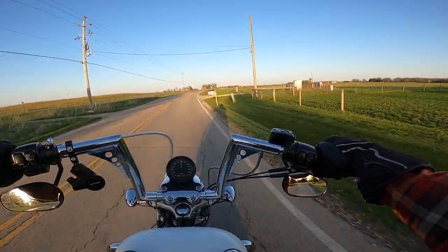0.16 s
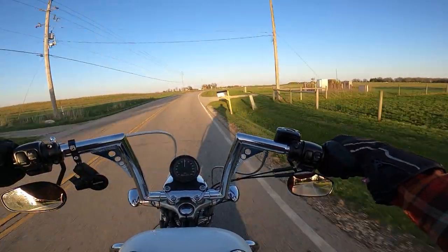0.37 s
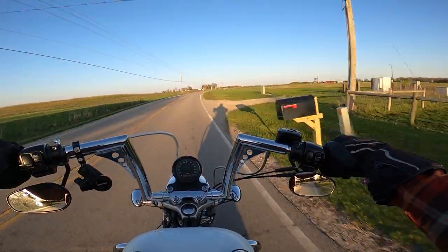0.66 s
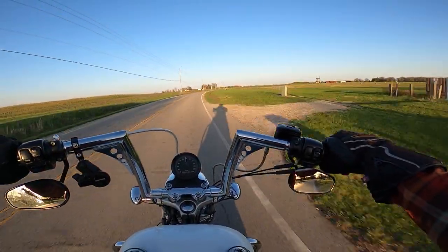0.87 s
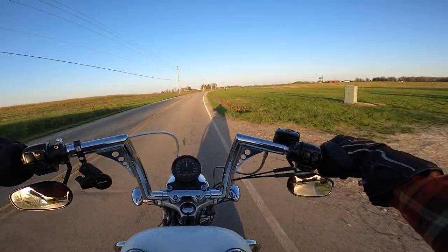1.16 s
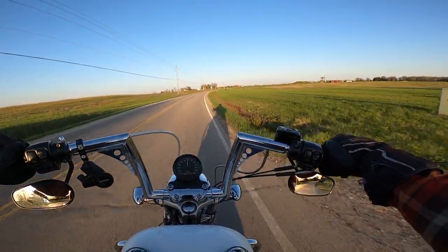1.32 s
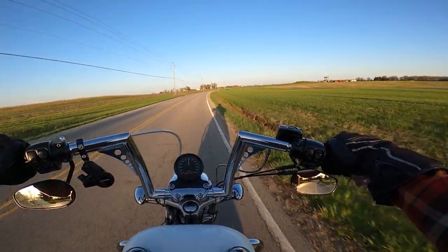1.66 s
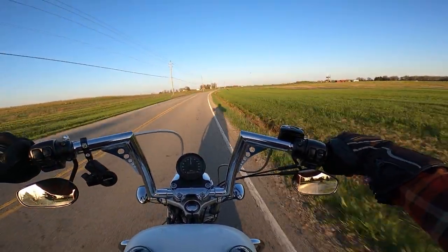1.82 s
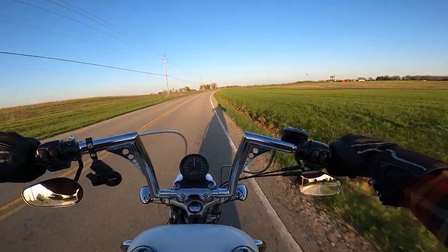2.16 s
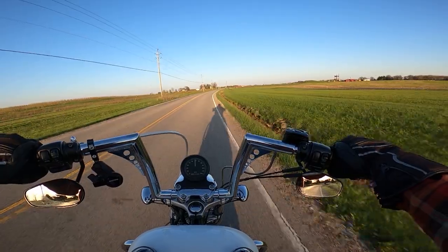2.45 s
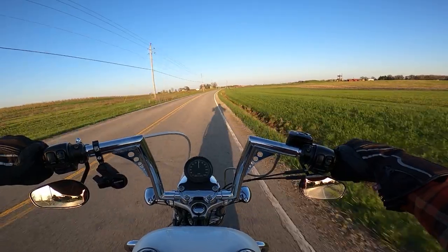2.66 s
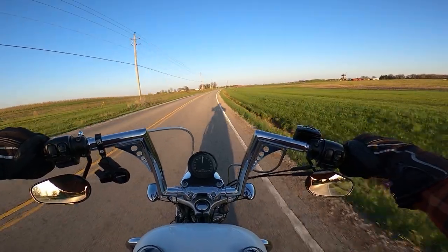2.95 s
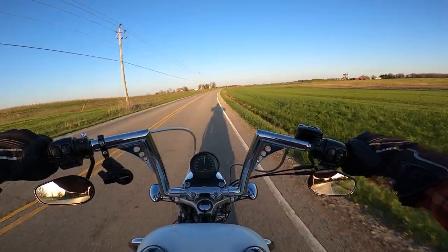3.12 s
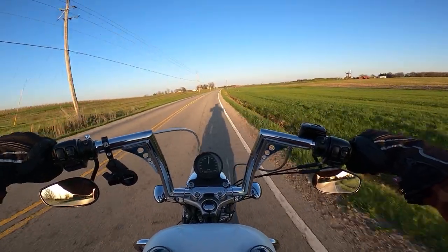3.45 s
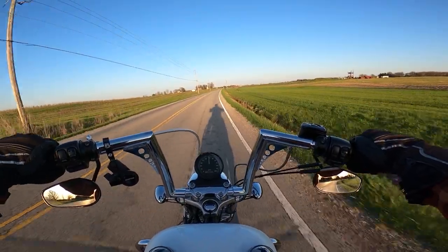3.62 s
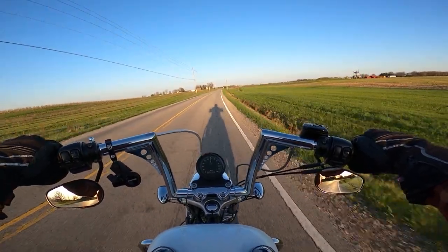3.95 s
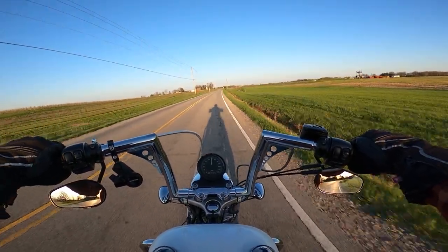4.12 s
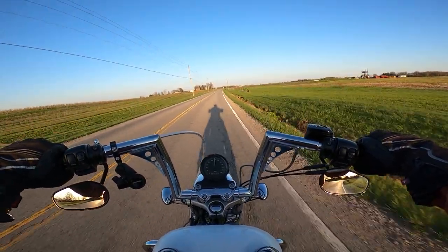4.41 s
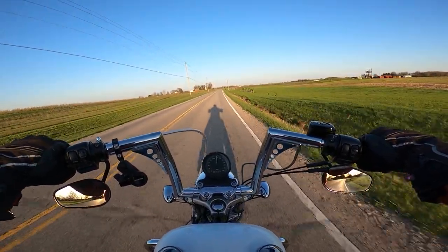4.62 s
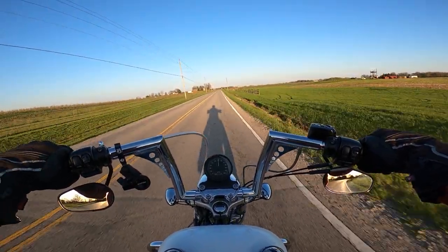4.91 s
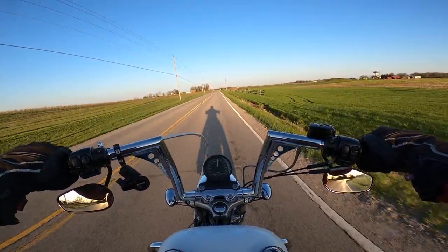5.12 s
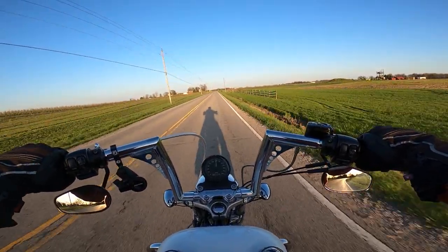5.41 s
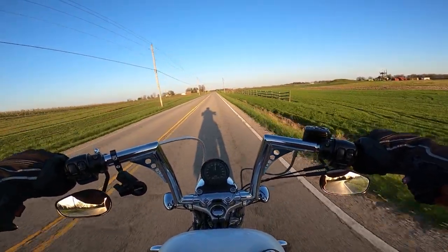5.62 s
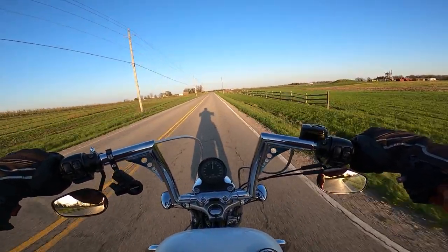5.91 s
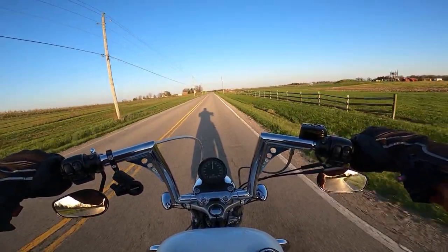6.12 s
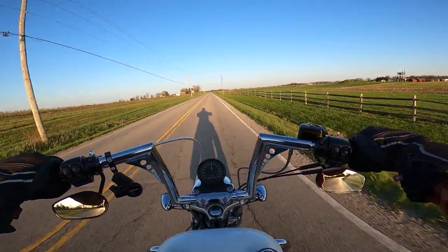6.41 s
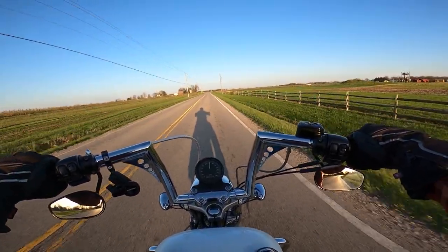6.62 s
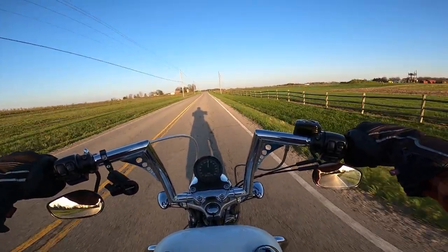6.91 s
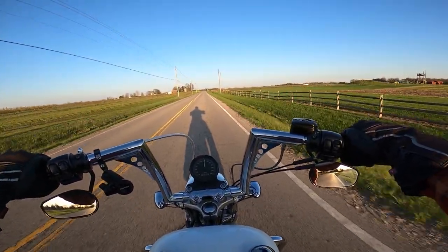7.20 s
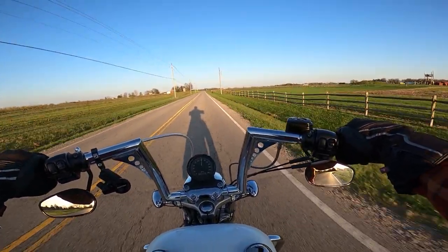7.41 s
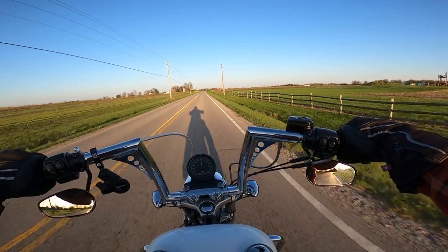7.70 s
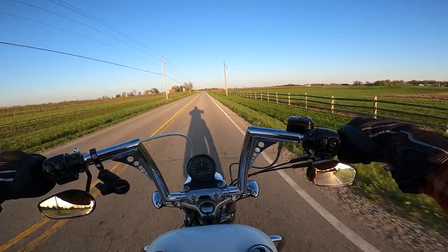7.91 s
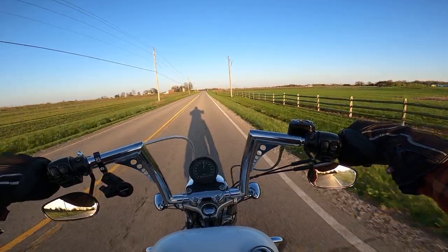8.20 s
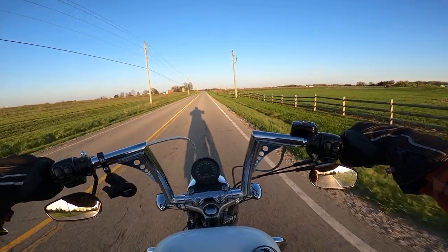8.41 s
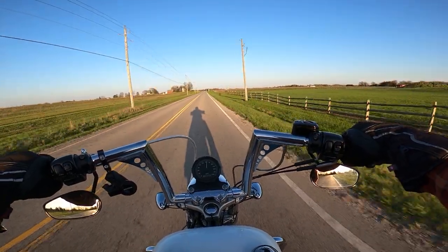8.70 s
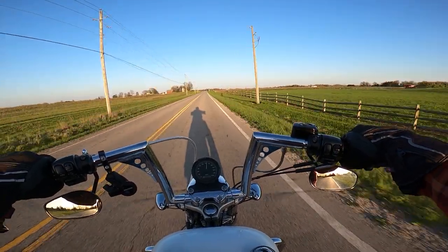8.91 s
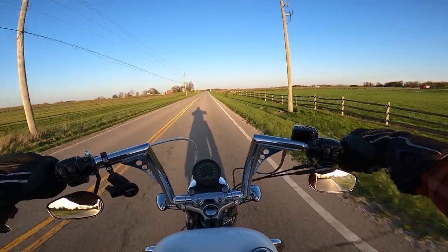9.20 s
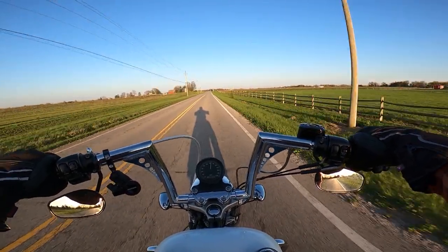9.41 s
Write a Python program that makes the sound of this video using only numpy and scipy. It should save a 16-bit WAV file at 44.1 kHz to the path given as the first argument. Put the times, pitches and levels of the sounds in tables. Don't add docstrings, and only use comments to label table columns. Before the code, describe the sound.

A narrow V-twin motorcycle cruises a country road, deep uneven exhaust throb with ticking valve gear, faint whine and low wind buffeting, heard from the rider's chest.

```python
import sys
import numpy as np
from scipy import signal
from scipy.fft import rfft, irfft
from scipy.io import wavfile
from scipy.ndimage import uniform_filter1d

SR = 44100
rng = np.random.default_rng(int(sys.argv[2]) if len(sys.argv) > 2 else 0)


def generate_wav(signal):
    frames = np.transpose(np.atleast_2d(signal))
    scaled = np.clip(frames, -1, 1) * 32767
    pcm = np.round(scaled).astype(np.int16)
    wavfile.write(sys.argv[1], SR, pcm)


def rack_gain(trim_db):
    fader = np.asarray(trim_db, float)
    return 10 ** (fader / 20)


N = 421155
TIME = np.arange(N) / SR
FIRING = (.693, .128)


def evened(x):
    return x / np.sqrt(np.mean(x ** 2) + 1e-20)


def coloured(spectrum):
    f, db = np.transpose(spectrum)
    hz = np.fft.rfftfreq(N, 1 / SR)
    shape = rack_gain(np.interp(np.log(hz + 1), np.log(f), db, left=-70, right=-120))
    return evened(irfft(rfft(rng.standard_normal(N)) * shape, N))


def drift(hz):
    return evened(signal.sosfilt(signal.butter(2, hz, fs=SR, output="sos"), rng.standard_normal(N)))


def resonate(x, hz, width):
    turn = np.exp(2j * np.pi * np.cumsum(hz * np.ones(N)) / SR)
    decay = np.exp(-np.pi * width / SR)
    return 2 * (turn * signal.lfilter([1 - decay], [1, -decay], x / turn)).real


def above(rpm, knee_rpm, db_per_rpm, waver_db=0):
    return db_per_rpm * np.maximum(rpm - knee_rpm, 0) + waver_db * drift(2.3)


def crank_speed():
    # (t/s, speed/rpm)
    speed = [(0.0, 2887.6), (0.7, 2878.1), (1.5, 2880.8), (2.3, 2888.4), (3.0, 2907.6), (3.8, 2925.3),
             (4.6, 2950.2), (5.3, 2968.2), (6.0, 2996.0), (6.8, 3019.9), (7.6, 3043.7), (8.3, 3068.2),
             (8.8, 3076.9), (9.25, 3076.5), (9.55, 3053.5)]
    return np.interp(TIME, *np.transpose(speed))


def exhaust(cycle, bark_db, upper_db):
    # (f/Hz, width/Hz, signed strength from front cylinder, from rear cylinder)
    pipes = [(115.8, 79.4, -0.0672, -0.0337), (130.47, 28.07, 0.21, 0.22), (193.4, 61.5, 0.0088, -0.0254),
             (231.3, 12, 0.026, -0.037), (284.5, 36.4, -0.035, -0.0209), (371.9, 104.3, 0.01536, 0.0226),
             (388.6, 68.7, -.014, -0.0239)]
    # (f/Hz, width/Hz, level/dB)
    upper_lifts = [(349.7, 23, 6.5), (422.3, 15, 12.5)]
    uneven_db, late_cycles = 0.92, 0.0024
    heat = np.gradient(cycle) * SR * 120 / 2965
    out = np.zeros(N)
    for side, place in enumerate(FIRING):
        blow_number = np.floor(cycle - place + 1.5).astype(int)
        chance = rng.standard_normal((300, 2))[blow_number]
        turn = cycle - place - late_cycles * chance[:, 1]
        pulses = sum(np.cos(2 * np.pi * k * turn) for k in range(1, 19))
        blows = rack_gain(uneven_db * chance[:, 0]) * pulses
        for hz, width, *strength in pipes:
            out += strength[side] * resonate(blows, hz * heat, width)
    out += sum((rack_gain(db) - 1) * resonate(out, hz * heat, width) for hz, width, db in upper_lifts)
    out += (rack_gain(1.3 * (bark_db - bark_db.mean())) - 1) * resonate(out, 315 * heat, 40)
    return out + (rack_gain(1.9 * (upper_db + 0.92)) - 1) * resonate(out, 390 * heat, 110)


def valve_gear(cycle, case_db, fin_db):
    # (level/dB into the tank, level/dB into the cases, level/dB into the fins)
    knocks = [(-8.5, -8, -4.5), (-3.5, -11.5, -10), (-27.5, -4.5, -8), (-25.5, -1, -11.5),
              (-33.5, -6.5, -2), (-27, -6, -10), (-31, -14, -8), (-30.5, -11.5, -1.5), (1, -14, -13.5),
              (-30.5, -10.5, -11), (-28.5, -4, -20.5), (-34, -8, -6.5), (-29.5, -10.5, -10.5),
              (0.5, -9.5, -9.5), (-27.5, -4.5, -1.5), (-33, -6, -6.5)]
    knock_places = (.03, .105, .175, .24, .285, .37, .44, .49, .53, .57, .605, .67, .70, .75, .84, .925)
    # (f/Hz, width/Hz)
    tank_mode = (514, 270)
    # (f/Hz, width/Hz, level/dB)
    case_modes = [(710, 56, 0), (898.5, 65, 3), (1087, 45, -1.5), (1294, 110, -0.5)]
    # (f/Hz, width/Hz, level/dB)
    fin_modes = [(2293, 430, 4), (2560, 190, 2.5), (3090, 470, -5), (3796, 150, -0.5)]
    spread_db, slow_db = 3.0, 1.3
    late_cycles, burst_s = 0.0018, 0.0012

    chance = np.clip(rng.standard_normal((int(cycle[-1]) + 1, len(knocks), 5)), -2, 2)
    slow = evened(uniform_filter1d(chance[..., 4:], size=40, axis=0))
    when = np.arange(len(chance))[:, None] + knock_places + late_cycles * chance[..., 0]
    at = np.minimum(np.searchsorted(cycle, when.ravel()), N - 1)
    blow_db = np.array(knocks) + spread_db * chance[..., 1:4] + slow_db * slow
    blows = np.zeros((3, N))
    blows[:, at] = rack_gain(blow_db).reshape(-1, 3).T
    thud, low, high = blows
    burst = signal.lfilter([1], [1, -np.exp(-1 / (burst_s * SR))], high) * rng.standard_normal(N)

    tank = resonate(resonate(thud, *tank_mode), *tank_mode)
    cases = [rack_gain(db) * evened(resonate(resonate(low, hz, w), hz, 6 * w)) for hz, w, db in case_modes]
    fins = [rack_gain(db) * resonate(resonate(burst, hz, w), hz, 3 * w) for hz, w, db in fin_modes]
    cases[1] *= rack_gain(0.47 * (case_db - case_db.mean()))
    cases[2] *= rack_gain(-1.2 * (case_db - case_db.mean()))
    fins[3] *= rack_gain(0.51 * (fin_db - fin_db.mean()))
    rings = rack_gain(-10.5) * evened(tank) + rack_gain(-6) * evened(sum(cases)) + rack_gain(-15) * evened(sum(fins))
    return signal.sosfilt(signal.butter(6, 5200, fs=SR, output="sos"), rings)


def jet(cycle):
    sharpness, rear_db, steady_db = 1.9, -7, -11
    front, rear = (np.exp(sharpness * (np.cos(2 * np.pi * (cycle - place - .02)) - 1)) for place in FIRING)
    swell = front + rack_gain(rear_db) * rear + rack_gain(steady_db)
    hiss = coloured([(2000, -16), (3500, -3.5), (5000, -7), (7000, -11.0), (10200, -25.5),
                     (12400, -24), (15500, -36)])
    return rack_gain(-24) * evened(swell * rack_gain(4.7 * np.tanh(drift(40))) * hiss)


def whine(cycle, rpm):
    # (order of the engine cycle, place of hardest mesh [cycles], level/dB at lower speed, level/dB at higher)
    tones = [(20, .8, -49.5, -47.5), (29, .22, -54.5, -51.5), (33, .62, -60, -53.5),
             (35, .62, -60.5, -44.5), (37, .62, -50, -57), (43, .67, -57.5, -53.5), (45, .67, -54, -60.5)]
    tone_rpm = (2933, 3075)
    waver_db, wobble_rad, cycle_db, turn_db = 1.9, 0.58, 4.0, 4.0
    out = np.zeros(N)
    for order, place, *db in tones:
        angle = 2 * np.pi * (cycle - place)
        mesh = evened(rack_gain(cycle_db * np.cos(angle) + turn_db * np.cos(2 * angle)))
        strength = np.sqrt(2) * rack_gain(np.interp(rpm, tone_rpm, db) + waver_db * drift(1.9))
        out += mesh * strength * np.cos(2 * np.pi * order * cycle + wobble_rad * drift(4))
    return out


def roar(cycle):
    # (f/Hz, level/dB per Hz)
    rush_spectrum = [(250, -29), (420, -26.5), (585, -35.5), (712, -3.5), (792, -3), (893, -12.5),
                     (978, -6.5), (1090, -3.5), (1900, -17.5), (2610, -13), (3580, -23), (6660, -34),
                     (9850, -47), (12500, -63.5), (15500, -66.5)]
    level_db, patchy_db = -5, 0.5
    throb = rack_gain(4.5 * np.cos(4 * np.pi * (cycle - .19)))
    rush = coloured(rush_spectrum)
    lower = signal.sosfiltfilt(signal.butter(3, 1700, fs=SR, output="sos"), rush)
    return rack_gain(level_db + patchy_db * drift(5.6)) * (rush + (evened(throb) - 1) * lower)


def gusts():
    # (t/s at the top, length/s, level/dB)
    swell_table = [(0.371, 0.23, -18), (0.625, 0.18, -15), (1.039, 0.36, -20.5), (1.201, 0.098, -24),
                   (1.702, 0.18, -19), (1.961, 0.1, -19), (2.201, 0.082, -20.5), (2.453, 0.14, -22.5),
                   (3.235, 0.62, -22), (3.584, 0.12, -16), (3.851, 0.11, -18.5), (4.22, 0.1, -25),
                   (4.533, 0.092, -23), (4.698, 0.1, -23), (4.92, 0.12, -24.5), (5.079, 0.18, -25),
                   (5.546, 0.26, -27.5), (6.307, 0.21, -23), (6.55, 0.4, -27), (6.914, 0.11, -27),
                   (7.126, 0.09, -28), (7.746, 0.18, -29), (8.159, 0.1, -23), (8.368, 0.089, -29.5),
                   (8.703, 0.15, -30.5), (9.479, 0.24, -18.5)]
    lull_db = -28
    swells = sum(rack_gain(2 * db) * np.exp(-4 * ((TIME - top) / length) ** 2) for top, length, db in swell_table)
    return 10 * np.log10(rack_gain(2 * lull_db) + swells)


def wind(level_db):
    # (f/Hz, level/dB per Hz)
    buffet_spectrum = [(15, -9.5), (25, -6), (40, 0), (65, 1.5), (100, -3), (150, -8.5), (250, -38)]
    # (f/Hz, level/dB per Hz)
    flutter_spectrum = [(60, -20), (110, -4.5), (200, -5), (400, -8.5), (600, -19), (900, -43.5)]
    lumpy_db, follow, flutter_db = 1.0, 0.5, -33
    buffet = rack_gain(level_db + 0.5) * evened(rack_gain(lumpy_db * drift(1.7)) * coloured(buffet_spectrum))
    flutter_level = flutter_db + follow * (level_db - level_db.mean())
    return buffet + rack_gain(flutter_level) * coloured(flutter_spectrum)


def treble_hiss():
    # (f/Hz, level/dB per Hz)
    hiss_spectrum = [(9000, -29), (10800, -14.5), (12400, 0), (13600, -4.5), (15500, -14)]
    return rack_gain(-80.5) * coloured(hiss_spectrum)


def scene():
    rpm = crank_speed()
    cycle = np.cumsum(rpm) / SR / 120
    pull_lag_s, firm_pull_rpm_per_s = 0.36, 25
    gain = uniform_filter1d(np.gradient(rpm) * SR, round(pull_lag_s * SR), mode="nearest")
    pull = np.tanh(gain / firm_pull_rpm_per_s)

    upper_db = above(rpm, 2993, -0.1655, 0.94)
    case_db = above(rpm, 2850, -0.01)
    fin_db = above(rpm, 3028, 0.24)
    bark_db = -4 * pull + above(rpm, 3057, 0.0738)

    clatter = valve_gear(cycle, case_db, fin_db) + roar(cycle) + jet(cycle)
    engine = rack_gain(1.5) * exhaust(cycle, bark_db, upper_db) + rack_gain(-35) * clatter + whine(cycle, rpm)
    return (engine + wind(gusts()) + treble_hiss())[None]


def band_limit(x):
    return signal.sosfilt(signal.butter(12, 15820, fs=SR, output="sos"), x)


def record(dry):
    power_db = 10 * np.log10(abs(uniform_filter1d(dry ** 2, 1500)) + 1e-9)
    bass = signal.oaconvolve(dry, signal.firwin(1001, 560, fs=SR)[None], "same")
    bass_held = bass / rack_gain(0.79 * uniform_filter1d(power_db + 11.5, 600))
    held = dry - bass + np.tanh(bass_held / 0.98)
    first_joint, block = 1060.5, 1837.5
    dip = np.ones(N)
    dip[np.round(np.arange(first_joint, N - 1, block)).astype(int)] = 1 - .052
    return band_limit(held * dip)


dry = scene()
out = record(dry)
generate_wav(out)
```